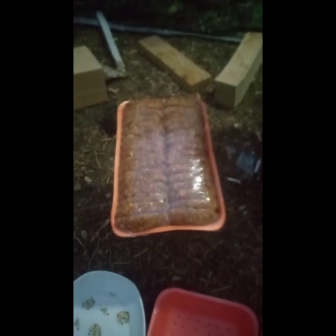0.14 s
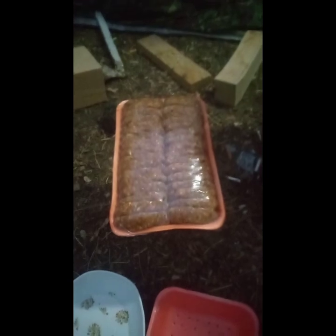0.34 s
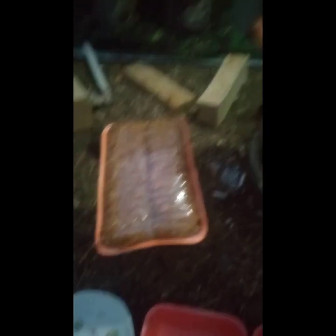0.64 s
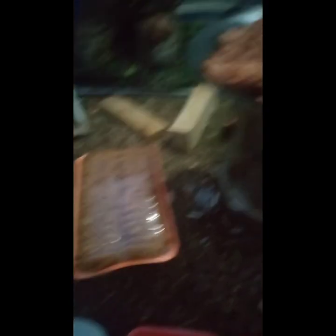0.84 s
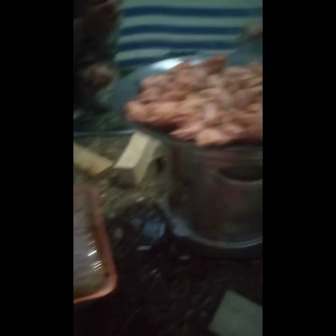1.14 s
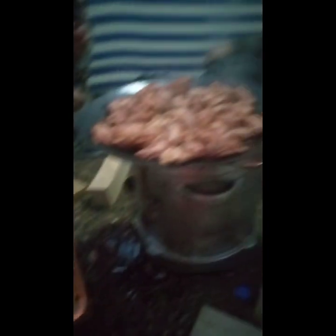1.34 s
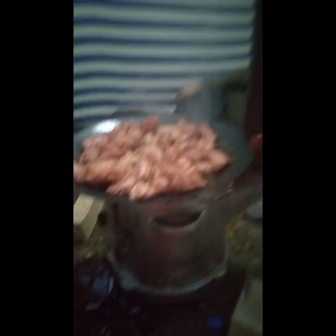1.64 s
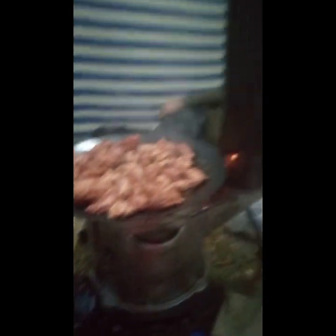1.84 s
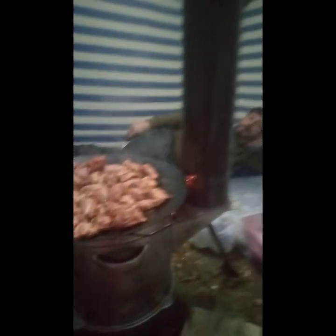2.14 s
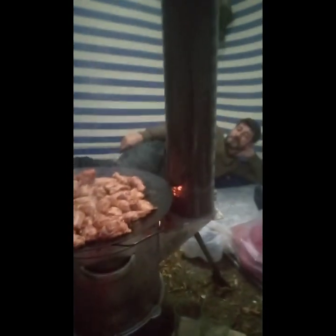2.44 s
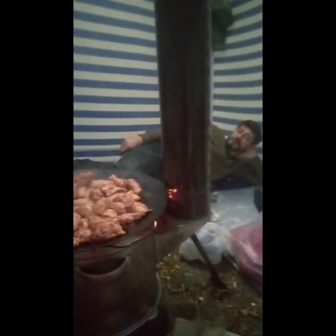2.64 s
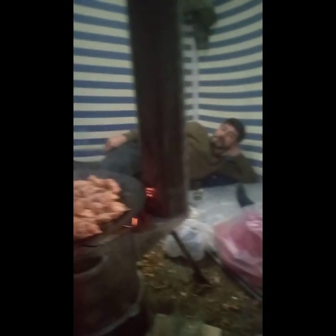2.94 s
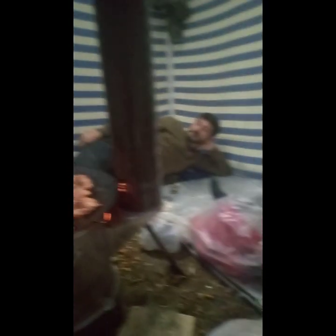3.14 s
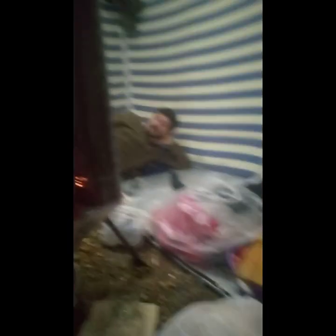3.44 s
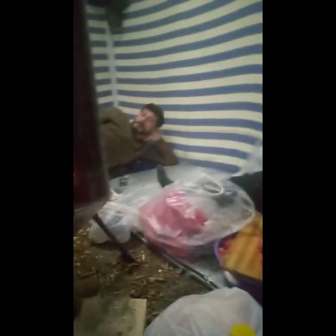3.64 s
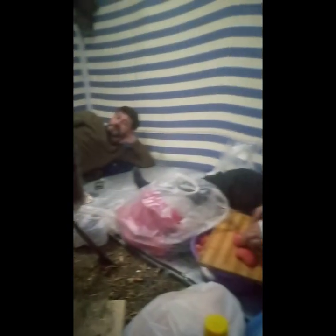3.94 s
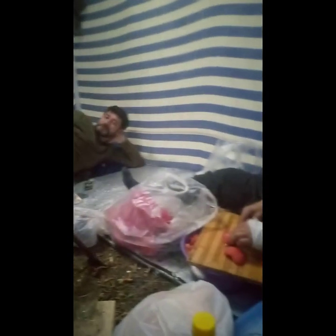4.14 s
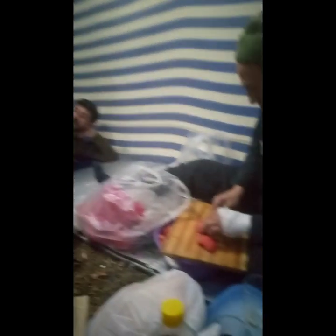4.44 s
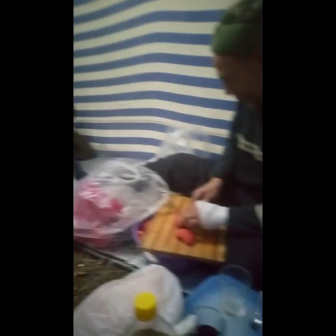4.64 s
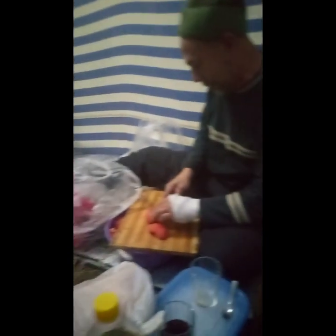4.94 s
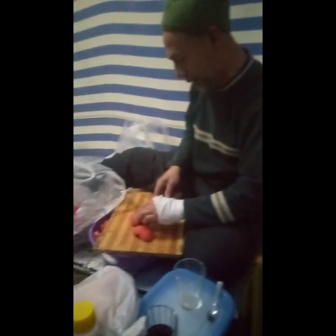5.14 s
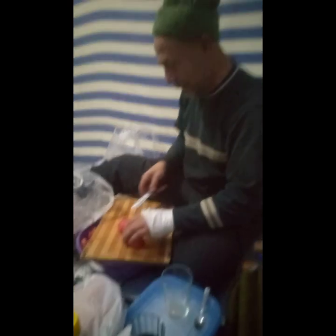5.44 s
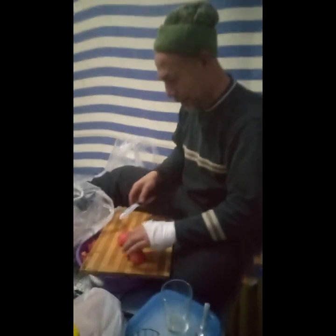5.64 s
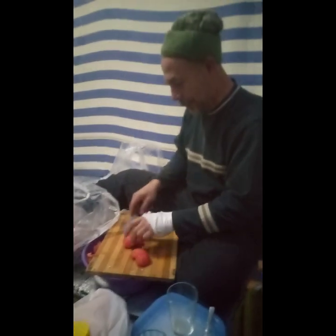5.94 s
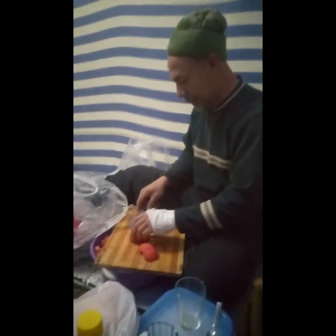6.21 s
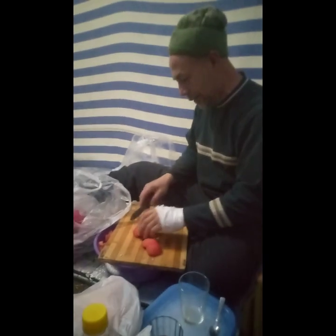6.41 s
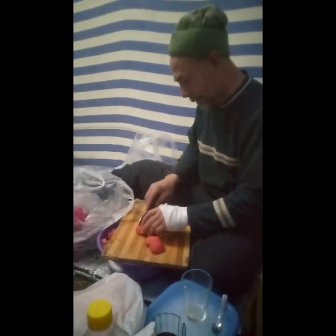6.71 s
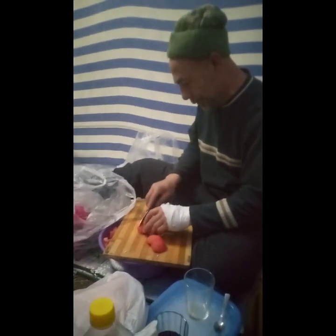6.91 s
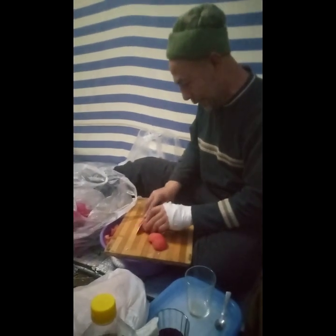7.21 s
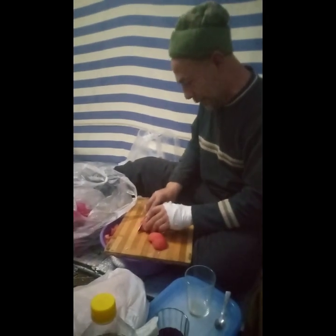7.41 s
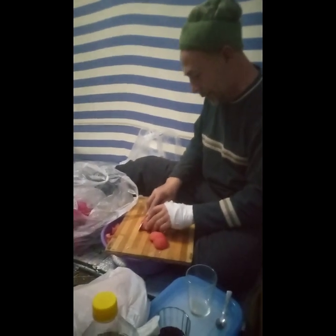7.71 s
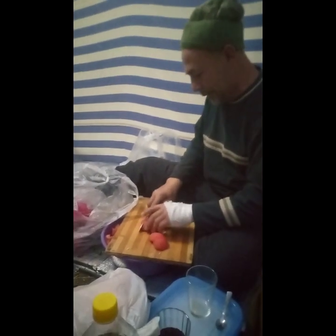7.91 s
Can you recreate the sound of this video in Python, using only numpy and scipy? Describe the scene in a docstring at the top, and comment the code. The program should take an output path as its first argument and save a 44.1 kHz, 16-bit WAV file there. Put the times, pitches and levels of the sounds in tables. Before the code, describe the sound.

Chicken pieces sizzle brightly on a hot griddle inside a tent, fat spitting and juice sputtering, with a low stove drone behind.

```python
"""A fine, bright sizzle patters like light rain: chicken pieces on a domed griddle inside a tarpaulin tent.
Countless bubbles burst as filtered random clicks, juice sputters in short runs of rising, ringing clicks,
and now and then the fat spits: a crack of decaying noise with a fizz of clicks after it.
Behind it the draught drones as noise through the air resonances of a wood stove and its flue.
Near the end a knife knocks twice on a cutting board, a sum of damped sines."""
import sys
import numpy as np
from scipy import signal
from scipy.fft import rfft, irfft
from scipy.io import wavfile
from scipy.ndimage import uniform_filter1d

SR = 44100
rng = np.random.default_rng(int(sys.argv[2]) if len(sys.argv) > 2 else 0)


def file_out(sig):
    """Save sig as 16-bit WAV at sys.argv[1]."""
    # one column per channel
    cols = np.atleast_2d(sig).T
    # limit, then scale
    lim = np.clip(cols, -1, 1)
    pcm = np.round(lim * 32767).astype(np.int16)
    wavfile.write(sys.argv[1], SR, pcm)


N = 355887
TIME = np.arange(N) / SR  # s

# steady frying between the flare-ups, before trims [t/s, frying level/dB, finest spray level/dB]
STEADY_FRYING = [(0.0, -44, -44), (0.7, -44, -42.5), (1.05, -43.5, -43.5), (1.55, -41.5, -42.5),
                 (1.93, -43, -46.5), (2.3, -42, -43), (2.7, -41, -45), (3.35, -41, -44), (3.85, -42, -46),
                 (4.65, -39, -42), (5.15, -40, -46), (5.52, -35, -41.5), (5.8, -40, -45), (6.25, -39, -44),
                 (6.7, -41.5, -45), (7.3, -39, -45.5), (8.07, -41, -45.3)]


def undb(db):
    """Decibels to gain."""
    return np.exp(np.asarray(db) * (np.log(10) / 20))


def unit(x):
    """Scale to an rms of one."""
    return x / np.sqrt(np.mean(x ** 2) + 1e-18)


def curve(table, axis=1):
    """One column of a table, joined by straight lines in time."""
    rows = np.array(table)
    return np.interp(TIME, rows[:, 0], rows[:, axis])


def add(track, s, sound):
    """Mix a sound into a track at time s."""
    start = int(np.clip(s * SR, 0, N - 1))
    track[start:start + len(sound)] += sound[:N - start]


def colour(x, points, size=4096):
    """Causal minimum-phase filter with the given (Hz, dB) outline, made by folding the cepstrum."""
    hz, db = np.transpose(points)
    bins_hz = np.arange(size // 2 + 1) * SR / size
    gain = undb(np.interp(np.log(bins_hz + 1), np.log(hz), db))
    cepstrum = irfft(np.log(gain))[:size // 2]
    cepstrum[1:] *= 2
    impulse = irfft(np.exp(rfft(cepstrum, size)))
    return signal.fftconvolve(x, impulse)[:len(x)]


def resonate(x, hz, width_hz):
    """A resonance with gain one at its centre."""
    b, a = signal.iirpeak(hz, hz / min(width_hz, SR / 4), fs=SR)
    return signal.lfilter(b, a, x)


def walk(rate):
    """Random levels held 1 / rate s and slewed; spread of one."""
    hold = int(SR / rate)
    steps = np.repeat(rng.standard_normal(N // hold + 1), hold)[:N]
    return unit(uniform_filter1d(steps, hold))


def pops(rate, spread_db, size=N):
    """Bubbles bursting at random, rate per second on average, as clicks of random sign and size."""
    chance = rng.random(size)
    strength = np.minimum(rng.standard_normal(size), 2.8)
    side = np.sign(rng.standard_normal(size))
    return (chance < rate / SR) * side * undb(spread_db * strength)


def draught():
    """Turbulent flames, as noise, excite the air in the stove and its flue."""
    # air resonances of stove and flue [f/Hz, width of each of two passes/Hz, relative level/dB]
    flue = [(77.2, 55, -5), (114.5, 30, -6), (142.6, 21.5, -1), (163.2, 21, 1.5), (214.4, 43, -1),
            (231.5, 21, 0), (248.8, 14.2, -0.5), (301, 46.5, -6.5)]
    # the fire's draught [t/s, level/dB]
    draught_level = [(0.0, -49), (0.29, -48.5), (0.45, -53), (1.15, -47), (2.3, -49), (3.2, -50),
                     (4.83, -46.5), (5.6, -57), (6.25, -46.3), (6.7, -48.5), (8.07, -46)]
    drone = np.zeros(N)
    for hz, width_hz, db in flue:
        turbulence = rng.standard_normal(N)
        drone += undb(db) * resonate(resonate(turbulence, hz, width_hz), hz, width_hz)
    return unit(drone) * undb(curve(draught_level))


def knife(contact_s=0.0018):
    """The blade goes through a tomato and lands softly on the wooden board, whose modes ring briefly."""
    # the knife meets the board [t/s, level of a 0 dB mode/dB]
    chops = [(7.218, -38.5), (7.521, -38)]
    # modes of the board [f/Hz, relative level/dB, t60/s]
    board = [(229, 8, 0.053), (350, 0, 0.065), (533, -0.5, 0.032), (710, 0, 0.028)]
    out, t = np.zeros(N), TIME[:SR // 5]
    knock = np.zeros(len(t))
    for hz, db, t60_s in board:
        knock += undb(db) * np.sin(2 * np.pi * hz * t) * undb(-60 * t / t60_s)
    soft_landing = 1 - np.exp(-t / contact_s)
    for s, db in chops:
        add(out, s, undb(db) * knock * soft_landing)
    return out


def spits(fizz_s=0.014, width_hz=2000, crack_db=-3.0, fizz_db=-13.0, bright_db=-11):
    """A drop flashes to steam with a bright crack; its spatter builds up and fizzes away on the griddle."""
    # the loudest drops of water exploding in the fat [t/s, level before crack and fizz trims/dB, centre f/Hz]
    drops = [(0.4712, -21, 6940), (1.219, -22, 6640), (1.3951, -20, 2970), (1.5367, -21, 5050),
             (1.6247, -20.5, 6600), (1.719, -18, 6560), (1.997, -23, 6840), (2.0887, -21.5, 3390),
             (2.1397, -12, 6900), (2.151, -11, 6070), (3.3148, -19.5, 6120), (3.4158, -17.5, 5430),
             (3.9565, -18.5, 4940), (4.007, -19, 6500), (4.015, -13, 6840), (4.021, -14.5, 7360),
             (4.5092, -20.5, 5000), (4.643, -15, 4400), (5.874, -18.5, 4600), (6.1669, -20.5, 5890),
             (6.333, -17.5, 6340), (6.5326, -14.5, 4540), (7.1222, -20.5, 5470), (7.2018, -19.5, 4580),
             (7.4932, -22, 6300), (7.809, -21.5, 6000)]
    out, t = np.zeros(N), TIME[:SR // 7]
    snap = np.exp(-t / 0.0008)
    spatter = np.exp(-t / fizz_s) * (1 - np.exp(-t / 0.00069))
    for s, db, hz in drops:
        burst = rng.standard_normal(len(t)) * snap
        crack = resonate(burst, hz, width_hz) + undb(bright_db) * burst
        crack /= np.abs(crack).max()
        bubbles = pops(rate=3500, spread_db=2.5, size=len(t))
        fizz = unit(resonate(bubbles, hz, width_hz)) * spatter
        add(out, s, undb(db + crack_db) * crack + undb(db + fizz_db) * fizz)
    return out


def sputters(rate=700, sharpness=10.0, first=1.2, lasting=0.68, plop_db=-13, rise=0.147, steady_hz=1350):
    """Juice meets hot metal: a dull plop and a run of ringing bubbles, which shrink and so rise a little."""
    # the loudest bursts of juice bubbles [t/s, nominal pitch f/Hz, level/dB, nominal length/s]
    juice_bursts = [(0.857, 1820, -43, 0.029), (1.116, 1780, -45.5, 0.044), (1.302, 2430, -47, 0.024),
                    (1.409, 2600, -39.5, 0.015), (1.717, 1440, -52, 0.12), (1.882, 1260, -50, 0.04),
                    (1.926, 2300, -43.5, 0.033), (2.346, 2050, -45.5, 0.07), (2.449, 1460, -45, 0.054),
                    (2.823, 1150, -49, 0.025), (3.021, 3750, -41, 0.025), (3.16, 1570, -43, 0.023),
                    (3.368, 2030, -45, 0.02), (3.642, 3000, -46, 0.05), (4.125, 2500, -43.5, 0.067),
                    (4.261, 1910, -43.5, 0.055), (4.341, 1300, -40, 0.032), (4.419, 3700, -42, 0.017),
                    (4.479, 1970, -46.5, 0.035), (4.8, 3700, -41.5, 0.06), (4.827, 2180, -39, 0.03),
                    (5.623, 2000, -46, 0.037), (5.957, 1580, -46.5, 0.047), (6.055, 4570, -39.9, 0.049),
                    (6.095, 1830, -49.5, 0.084), (6.256, 2080, -48, 0.1), (6.297, 4020, -33.5, 0.018),
                    (6.537, 1504, -42, 0.047), (6.599, 2370, -43, 0.051), (6.69, 2110, -44, 0.017),
                    (6.869, 3020, -46, 0.092), (6.924, 2080, -47.5, 0.09), (7.319, 2730, -46, 0.076),
                    (7.437, 2450, -43.5, 0.034), (7.533, 1530, -50.5, 0.055), (7.778, 1960, -50, 0.058)]
    out, t = np.zeros(N), TIME[:SR // 6]
    for s, hz, db, length_s in juice_bursts:
        run = pops(rate, spread_db=-0.5, size=len(t)) * np.exp(-(t / (lasting * length_s)) ** 2)
        run[0] += first  # the first bubble sets it off
        ring_q = sharpness * np.sqrt(2000 / hz)  # large bubbles ring more purely
        ring = resonate(resonate(run, hz, hz / ring_q), hz, hz / 1.9)
        # the largest bubbles hold their pitch; the smaller they are, the more they rise
        smallness = np.clip(np.log2(hz / steady_hz), 0, 1)
        pitch = 1 + rise * smallness * (np.minimum(2 * t / length_s, 2) - 0.5)
        ring = np.interp(np.cumsum(pitch) / SR, t, ring)  # replayed at the changing pitch
        plop = resonate(run * np.exp(-t / 0.0051), hz / 2, hz / 2)
        sputter = unit(ring) + undb(plop_db) * unit(plop)
        # the level counts over the nominal length, not over the whole window
        add(out, s, sputter * np.sqrt(length_s / t[-1]) * undb(db))
    return out


def flares(axis, attack_s=0.017, release_s=0.026):
    """Power of the flare-ups: each builds up, holds while the juice lasts and dies away."""
    # juice runs onto the hot metal and hisses off [t/s, length/s, level/dB, crackle level before trim/dB]
    flare_ups = [(0.406, 0.23, -47.5, -50), (0.875, 0.059, -43, -57), (1.152, 0.16, -41.5, -62),
                 (2.083, 0.2, -39.5, -47), (2.91, 0.028, -37.5, -62), (3.6, 0.12, -39, -50),
                 (3.998, 0.11, -39, -51), (5.3, 0.28, -52, -49), (5.893, 0.18, -43, -46),
                 (6.206, 0.11, -42.5, -43), (6.877, 0.12, -40.5, -53), (7.19, 0.12, -42, -54)]
    power = np.zeros(N)
    for row in flare_ups:
        since, length_s = TIME - row[0], row[1]
        build_up = np.clip(since / attack_s, 0, 1)
        die_away = np.exp(-np.maximum(since - length_s, 0) / release_s)
        power += (undb(row[axis]) * build_up * die_away) ** 2
    return power


def frying():
    """Gain of the frying: the powers of the steady sizzle and its flare-ups together."""
    return np.sqrt(undb(curve(STEADY_FRYING)) ** 2 + flares(axis=2))


def patter(low_hz=2300, high_hz=7000, decay_s=0.012, spread_db=3, gain_db=-6.5, count=260):
    """Tiny sputters all over the griddle, each a few bubbles at a pitch of its own."""
    out, t = np.zeros(N), TIME[:SR // 16]
    for when, size, strength in rng.random((count, 3)):
        hz = low_hz * (high_hz / low_hz) ** size
        run = pops(rate=600, spread_db=3.5, size=len(t)) * np.exp(-t / decay_s)
        run[0] += 1
        ring = resonate(resonate(run, hz, hz / 4), hz, hz / 2)
        add(out, when * N / SR, unit(ring) * undb(spread_db * (2 * strength - 1)))
    return unit(out) * frying() * undb(gain_db)


def simmer(low_hz=1250, high_hz=3300, flurry_db=4.0, slope_db=5.5, count=9):
    """Larger bubbles come in little runs, each size at its own moments; slope_db is per octave."""
    out = np.zeros(N)
    for hz in np.geomspace(low_hz, high_hz, count):
        flurries = undb(flurry_db * np.minimum(walk(rate=35), 1.5))
        run = pops(rate=700, spread_db=7) * flurries
        ring = resonate(resonate(run, hz, hz / 5), hz, hz / 2)
        out += unit(ring) * undb(slope_db * np.log2(hz / low_hz))
    return unit(out)


def sizzle(tick_db=-13.5, flare_spray_db=-7, flare_tick_db=3.0, unrest_db=0.9, simmer_over_boil_db=11):
    """Bubbles from coarse to fine burst as clicks, each population with its own rate and colour."""
    # slow boiling of juice under the meat, fainter as the microphone turns away [t/s, level before trims/dB]
    boiling = [(0.0, -56), (1.15, -59), (2.6, -58.5), (3.7, -61.5), (4.8, -62), (5.66, -63.5), (6.2, -61.5),
               (8.07, -63)]
    # colours of the bursting bubbles, from coarse to the sharpest ticks [f/Hz, gain/dB]
    boil_colour = [(150, -32.5), (350, -3), (600, -0.5), (1000, -0.5), (1500, -24.5), (3000, -18.5)]
    fry_colour = [(500, -31.5), (1000, -17), (1500, -12), (2100, -5), (3300, 0), (4500, -0.5), (5500, -1),
                  (7000, -8.5), (9000, -12), (16000, -11.5)]
    spray_colour = [(2000, -20), (4500, -16.5), (5800, -2), (6550, 3), (7000, -0.5), (10000, -5.5),
                    (16000, -12.5)]
    tick_colour = [(2000, -18), (6000, -17), (10000, -2), (16000, 3)]
    boil = unit(colour(pops(rate=900, spread_db=4), boil_colour))
    fry = unit(colour(pops(rate=6000, spread_db=4.0), fry_colour))
    spray = unit(colour(pops(rate=9900, spread_db=5), spray_colour))
    ticks = unit(colour(pops(rate=800, spread_db=19), tick_colour))
    boiling_db = curve(boiling)
    spray_db = curve(STEADY_FRYING, axis=2)
    # every flare-up throws up more spray and crackles with sharp ticks
    spray_gain = np.sqrt(undb(spray_db) ** 2 + flares(axis=2) * undb(flare_spray_db) ** 2)
    tick_gain = np.sqrt(undb(spray_db + tick_db) ** 2 + flares(axis=3) * undb(flare_tick_db) ** 2)
    # fry, spray and ticks swell and sink a little together
    unrest = undb(unrest_db * walk(rate=14))
    # bubbles come in flurries, so each population also flickers on its own
    boil *= undb(boiling_db + 3.0 + 1.7 * walk(rate=25))
    simmering = simmer() * undb(boiling_db + simmer_over_boil_db)
    fry *= frying() * undb(-1.34 + 0.73 * walk(rate=70))
    spray *= spray_gain * undb(0.9 + 1.8 * walk(rate=40))
    ticks *= tick_gain * undb(1.8 * walk(rate=22))
    return boil + simmering + unrest * (fry + spray + ticks)


def tent(x, t60_s=0.25, wet_db=-4, first_s=0.003, size=4096):
    """Tarpaulin walls return a short scatter of reflections, changing as bubbles and microphone move."""
    t, wet = TIME[:SR // 4], np.zeros(N)
    window, padded = signal.get_window("hann", size), np.pad(x, (0, size))
    # overlapping slices, each with a fresh random scatter
    for start in range(0, N, size // 2):
        echoes = rng.standard_normal(len(t)) * undb(-60 * t / t60_s) * (t > first_s)
        echoes /= np.linalg.norm(echoes)
        add(wet, start / SR, signal.fftconvolve(padded[start:start + size] * window, echoes))
    return (x + undb(wet_db) * wet) / np.hypot(1, undb(wet_db))


def scene():
    """Griddle and cutting board among the tent's reflections, with the stove's drone added dry."""
    in_tent = tent(sizzle() + patter() + sputters() + spits() + knife())
    return (in_tent + draught())[None]


def record(dry, top_hz=15450):
    """The microphone port colours the treble, and a steep low-pass cuts the top."""
    # response of the microphone behind its port [f/Hz, gain/dB]
    mic = [(20, -22), (35, -3.5), (60, -1.5), (6000, 2.5), (7200, 3.5), (8100, -7.5), (9500, -14),
           (11500, -16.5), (13700, -16), (14700, -4), (16000, -1)]
    cut = signal.ellip(14, 0.2, 70, top_hz, fs=SR, output="sos")
    return signal.sosfilt(cut, colour(dry[0], mic))[None]


dry = scene()
out = record(dry)
file_out(out)
```